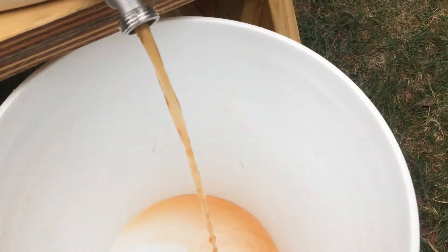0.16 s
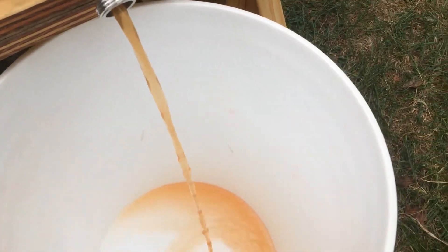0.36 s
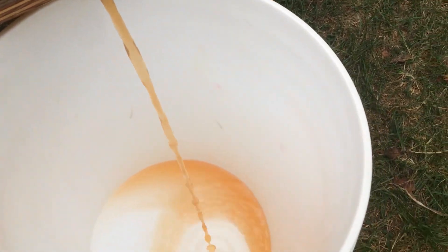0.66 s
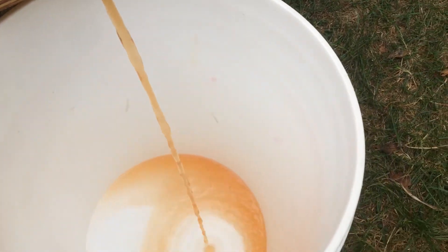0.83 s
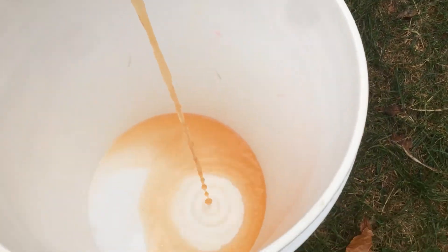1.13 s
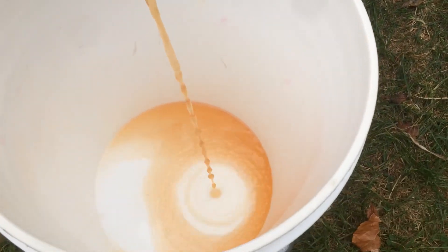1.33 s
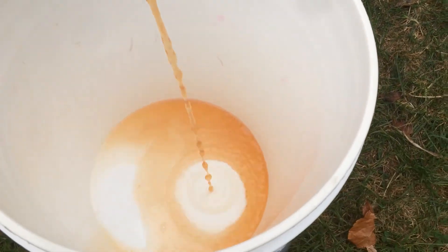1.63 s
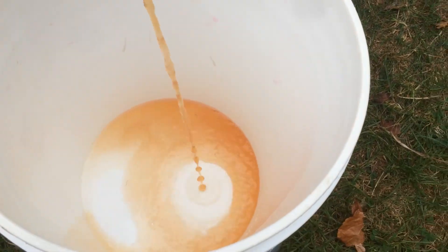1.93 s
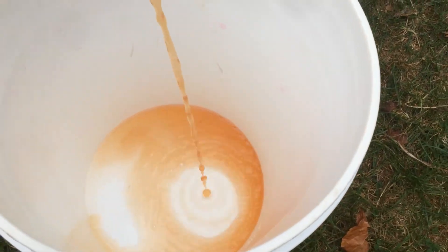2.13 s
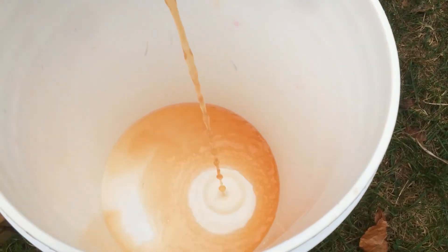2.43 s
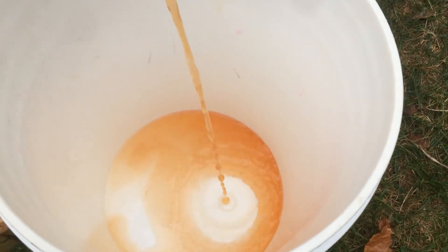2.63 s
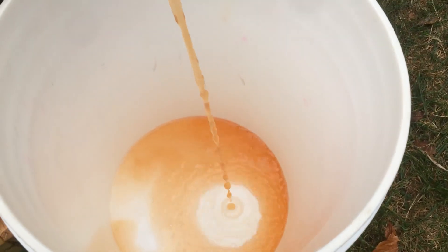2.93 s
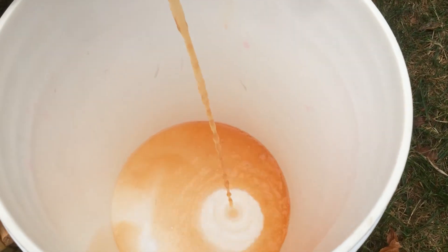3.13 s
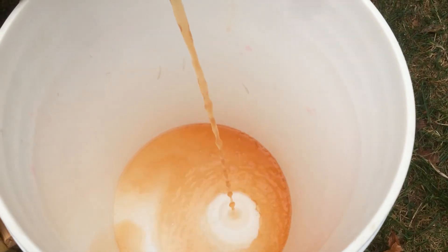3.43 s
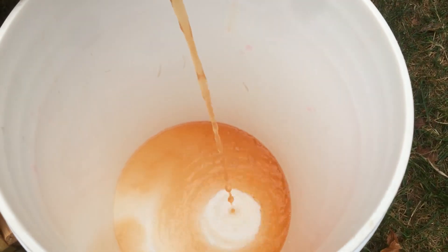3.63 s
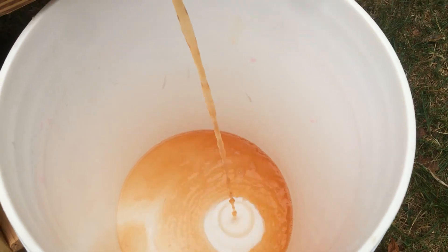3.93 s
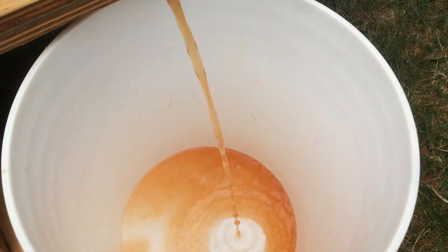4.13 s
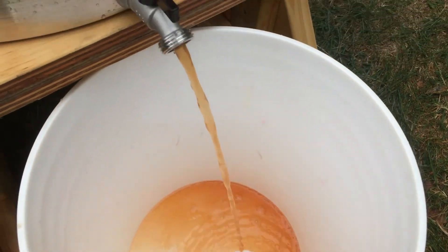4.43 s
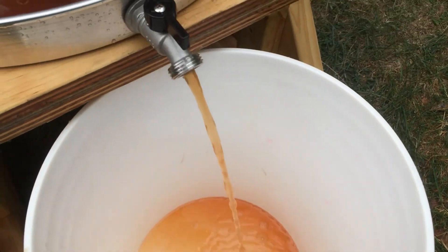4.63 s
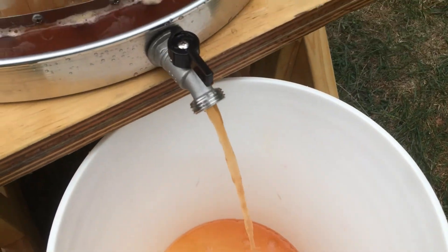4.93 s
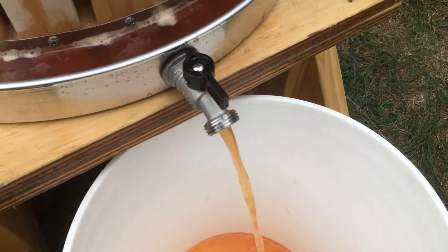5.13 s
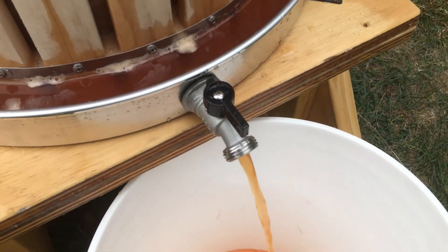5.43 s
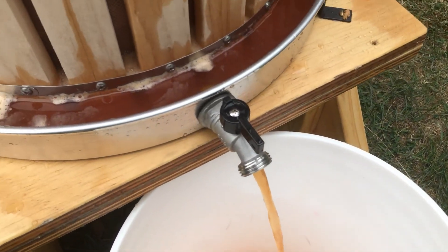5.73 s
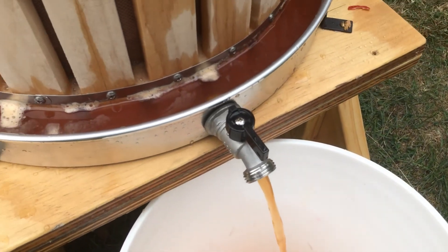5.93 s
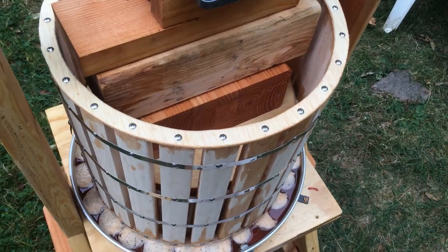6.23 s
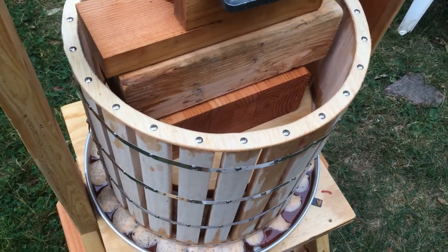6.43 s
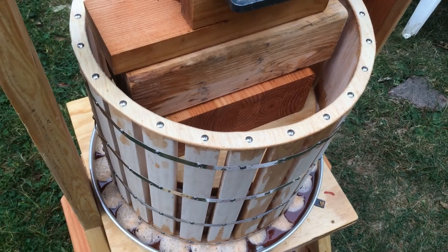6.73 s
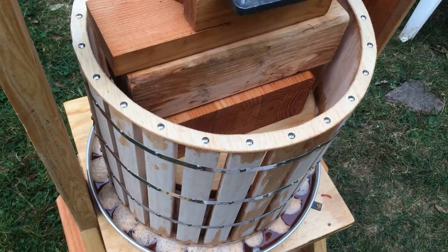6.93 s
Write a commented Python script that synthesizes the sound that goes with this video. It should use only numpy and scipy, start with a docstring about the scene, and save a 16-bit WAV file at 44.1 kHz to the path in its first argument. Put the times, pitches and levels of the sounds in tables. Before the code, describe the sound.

Close at a bucket's rim outdoors, a thin stream of juice breaks into beads that patter irregularly on the shallow liquid, with hollow plastic thuds, wet slaps and tiny bright bubble plinks. It thickens in the middle, then eases. One soft knock rattles the bucket late on. Abruptly the sound changes to a much quieter wooden press, where juice and foam spit, fizz and crackle.

```python
"""Juice dripping into a bucket

A thin stream of juice falls from a fruit press into an almost empty plastic bucket, outdoors, heard from the rim.
Its beads excite ringing modes of the bottom and shell, slap the juice in noise bursts and trap bubbles,
which are short decaying sine tones. The bucket gets one bump, made of ringing modes and a rattle.
At 6.1 s we are at the press itself, where juice and foam spit and crackle between the slats."""
import sys
import numpy as np
from scipy import signal
from scipy.fft import rfft, irfft, next_fast_len
from scipy.io import wavfile
from scipy.ndimage import uniform_filter1d

SR = 44100
rng = np.random.default_rng(int(sys.argv[2]) if len(sys.argv) > 2 else 0)


def wrap_up_sound(samples):
    """Save the sound to the file named by the first command line argument, as 16-bit audio."""
    columns = np.atleast_2d(samples).T
    # keep every value between -1 and 1, then stretch to whole-number steps
    tamed = np.clip(columns, -1, 1)
    steps = np.round(tamed * 32767).astype(np.int16)
    wavfile.write(sys.argv[1], SR, steps)


N = 311787
TIME = np.arange(N) / SR  # seconds, for the whole sound
AGE = np.arange(SR // 4) / SR  # seconds since the start of one short event
PRESS_START_S = 6.115  # the bucket gives way to the press
TOP_HZ = 16100  # nothing is kept from here up

# Large beads that hit the bottom. Each row: start in seconds, then relative levels of slap, thud and crack in dB.
LARGE_BEADS = [(0.143, -29.5, -46.5, -47.5), (0.291, -34, -54, -44), (0.335, -42.5, -48.5, -51),
               (0.433, -34, -47.5, -39), (0.469, -29, -45, -46.5), (0.56, -30, -49, -45),
               (0.614, -45, -49, -64), (0.739, -42.5, -50, -94), (0.784, -28, -42.5, -55.5),
               (0.798, -65, -44.5, -49), (0.888, -44, -49, -67), (1.052, -39, -54, -60),
               (1.132, -30.5, -43, -65), (1.148, -34, -48.5, -80), (1.209, -38, -47, -66),
               (1.263, -47.5, -54.5, -71), (1.399, -32, -47, -60), (1.413, -49, -55, -53),
               (1.444, -37.5, -55, -49.5), (1.519, -31, -44.5, -54.5), (1.546, -26.5, -54, -38.5),
               (1.572, -27.5, -47.5, -49), (1.581, -29, -61, -47), (1.599, -33, -42.5, -62),
               (1.613, -27.5, -46, -48), (1.65, -38, -47, -50.5), (1.794, -36.5, -48.5, -56.5),
               (1.819, -30.5, -46, -61), (1.907, -32.5, -48, -59), (1.886, -53, -45.5, -64),
               (1.951, -29.5, -42.5, -54), (2.073, -33, -59, -48), (2.147, -57, -58, -78),
               (2.212, -27, -39.5, -43.5), (2.248, -36, -47.5, -48), (2.352, -40.5, -50.5, -62.5),
               (2.406, -30, -43, -48), (2.465, -34, -46.5, -48.5), (2.518, -27, -45, -73),
               (2.551, -51, -47, -69), (2.598, -31, -43, -76), (2.745, -35, -44, -54.5),
               (2.777, -25, -41.5, -43.5), (2.814, -32, -40.5, -56), (2.885, -35.5, -47, -57),
               (2.968, -39, -40, -61), (2.999, -26.5, -42, -65.5), (3.045, -27.5, -46, -50.5),
               (3.075, -27, -44, -43), (3.17, -32, -50, -45), (3.201, -35, -50, -55),
               (3.22, -36, -41.5, -54), (3.336, -30.5, -39, -77), (3.36, -36.5, -45, -49.5),
               (3.398, -40, -44.5, -49), (3.415, -32, -40.5, -43), (3.459, -26.5, -39.5, -46),
               (3.503, -33, -41.5, -45), (3.622, -30, -42.5, -47), (3.702, -34.5, -43, -54),
               (3.779, -26.5, -39, -42.5), (3.828, -39, -44.5, -55), (3.847, -32.5, -42, -43.5),
               (3.932, -46, -47.5, -65), (4.022, -39.5, -43, -61), (4.111, -47.5, -46.5, -60.5),
               (4.209, -36, -43, -46.5), (4.285, -33.5, -41.5, -61), (4.324, -34, -42.5, -53),
               (4.358, -37.5, -45, -51.5), (4.449, -39.5, -45.5, -61), (4.5, -46, -47, -67),
               (4.53, -39.5, -43.5, -62), (4.683, -36.5, -41, -52), (4.782, -37.5, -40.5, -54.5),
               (4.864, -47.5, -49, -57), (5.065, -75, -47, -92), (5.226, -36, -41, -47),
               (5.267, -30.5, -41, -48), (5.359, -50, -47.5, -55), (5.431, -42.5, -44.5, -61.5),
               (5.533, -42, -44.5, -54.5), (5.688, -36, -41.5, -46), (5.708, -34, -42.5, -46),
               (5.91, -47, -47.5, -81), (5.975, -37.5, -47.5, -61.5), (6.073, -32, -41, -49.5)]
# Spells of small beads. Each row: first and last time in seconds, relative slap and thud levels in dB.
PATTER_SPELLS = [(0.189, 0.29, -49.5, -50.5), (1.821, 2.3, -42, -51.5), (2.645, 2.748, -50, -54.5),
                 (2.985, 3.25, -41.5, -47), (3.34, 3.519, -43, -51), (3.79, 4.42, -52, -60),
                 (4.85, 6.097, -56.5, -58.5)]
# Steady push of the stream on the bottom. Each row: time in seconds, relative level in dB.
STREAM_PUSH = [(0.04, -44), (0.34, -43.5), (0.85, -48.5), (1.22, -46.5), (1.75, -42.5), (2.3, -45.5),
               (2.96, -40.5), (3.14, -49.5), (4.99, -45.5), (5.54, -54.5), (5.93, -46), (6.0, -62)]
# Low modes of the wet bottom. Each row: pitch in Hz, width in Hz, relative level in dB.
BOTTOM_MODES = [(124.9, 13.2, -8.5), (169.3, 10.4, -6), (202.2, 14.1, -1.5)]
# Level of the deepest of these modes as juice gathers. Each row: time in seconds, relative level in dB.
DEEPEST_LEVEL = [(0, 4.5), (1.3, 5), (2.5, -5.5), (6, -1.5)]
# Two middle modes of the bottom, which sink as juice gathers, while the upper one takes over.
# Each row: time in seconds, lower pitch in Hz, lower level in dB, upper pitch in Hz, upper level in dB.
THUD_PAIR = [(0, 576, -0.5, 693, -14), (1.6, 545, 1.5, 684, -3), (2.3, 510, -4, 615, -5),
             (3.2, 503, -11, 613.5, -2), (4.3, 476, -10, 591, 3), (6, 427, -19, 543.3, -0.5)]
# Higher modes of the bucket. Each row: pitch in Hz, relative level in dB, time to die by 60 dB in seconds.
SHELL_MODES = [(775, 1.5, 0.11), (852, -2, 0.11), (945, 3.5, 0.07), (1013, -3.5, 0.1), (1100.5, 3.5, 0.075),
               (1241, -10, 0.13), (1405, 2.5, 0.066), (1488, -0.5, 0.079), (1570, 1, 0.05),
               (1780, -7, 0.098), (1950, -17.5, 0.28), (2150, -15, 0.12), (2244, -11.5, 0.092)]
# Colour of the slap's splash. Each row: frequency in Hz, level in dB per Hz.
SPLASH_SPECTRUM = [(200, 2.5), (700, 10), (1100, -22.5), (2000, -1), (4500, -7.5), (12000, -18),
                   (16000, -29)]
# Colour of a bead's first crack on the juice. Each row: frequency in Hz, level in dB per Hz.
CRACK_SPECTRUM = [(200, -11.5), (700, 1), (1500, -3), (2500, -8), (4500, -9), (12000, -11.5),
                  (16000, -16.5)]
# How sounds die in the hollow of the bucket. Each row: frequency in Hz, time to die by 60 dB in seconds.
HOLLOW_DECAY = [(400, 0.43), (1000, 0.17), (2000, 0.16), (4000, 0.16), (14000, 0.054)]
# The loudest bubbles in the bucket. Each row: start in seconds, relative level in dB, pitch in Hz.
LOUD_BUBBLES = [(0.254, -29.5, 14000), (0.269, -29, 9000), (0.2942, -23.5, 4930), (0.4325, -21, 3120),
                (0.448, -33, 12100), (0.591, -38, 11370), (0.7653, -31.5, 10650), (1.236, -35.5, 9130),
                (1.4324, -35, 9700), (1.4451, -33, 8850), (1.545, -24.5, 7400), (1.5601, -25, 6800),
                (1.593, -32, 7450), (1.8317, -30, 7290), (1.936, -29.5, 7700), (1.9618, -33.5, 3050),
                (1.9867, -25.5, 7100), (2.0863, -35.5, 9700), (2.2467, -24.5, 12800), (2.283, -33.5, 8300),
                (2.479, -26.5, 9000), (2.776, -30.5, 4540), (2.8848, -28.5, 11300), (2.9897, -26.5, 8900),
                (2.9999, -23, 5050), (3.016, -25, 5100), (3.0767, -25.5, 4500), (3.0879, -23, 7740),
                (3.184, -23, 7300), (3.373, -34, 8100), (3.4117, -31.5, 4900), (3.437, -33.5, 8060),
                (3.5025, -24, 5130), (3.622, -32.5, 7900), (3.6559, -32, 11300), (3.815, -40, 7640),
                (3.837, -32.5, 10700), (3.964, -38, 8960), (4.107, -35.5, 10600), (4.143, -37, 11890),
                (4.2098, -33.5, 4440), (4.277, -38.5, 9500), (4.3842, -31.5, 9300), (4.72, -39.5, 9130),
                (4.7537, -33, 8500), (4.838, -34, 7640), (4.8947, -32, 7900), (4.909, -30.5, 7760),
                (4.9518, -30, 10300), (5.084, -36, 8200), (5.24, -34.5, 10500), (5.578, -35, 9300),
                (5.7, -28.5, 8550), (5.829, -40, 9610), (5.931, -37, 8950)]
# Level of the fine spray. Each row: time in seconds, level in dB.
SPRAY_LEVEL = [(1.4, -70), (2, -53.5), (4.5, -47), (6.1, -40)]
# Short swelling tones, single or stacked. Each row: start in seconds, relative level in dB, list of pitches in Hz.
SWELLING_TONES = [(1.144, -55, [2140, 2430, 2745, 3750, 4230, 5720]), (1.598, -43, [1500, 5600]),
                  (1.809, -53, [1405, 1754, 2270]), (3.087, -48, [3710, 4570, 5950, 7340, 8080]),
                  (4.436, -58, [2885, 1860, 2640]), (4.794, -53, [1410, 1814, 2100, 3120]),
                  (5.428, -58, [1927]), (5.983, -59, [1577, 1959]), (6.217, -47.5, [2750]),
                  (6.895, -51, [3100, 2450]), (6.98, -47, [2000, 2200]), (7.03, -52, [1900])]
# Modes of the bumped wall. Each row: pitch in Hz, relative level in dB, time to die by 60 dB in seconds.
BUMP_MODES = [(378, -1, 0.12), (934, -23, 0.18), (1350, -18, 0.14), (1760, -19, 0.22)]
# Juice spitting between the slats. Each row: start in seconds, level in dB, pitch in Hz, relative squelch in dB.
SLAT_SPITS = [(6.224, -43.5, 6440, -51), (6.269, -38, 9200, -62), (6.27, -38, 4060, -61),
              (6.281, -28.5, 4420, -46), (6.285, -38, 11900, -65), (6.379, -48, 3600, -64),
              (6.41, -42, 6950, -82), (6.461, -34, 7100, -37.5), (6.575, -37.5, 7000, -55),
              (6.583, -38, 3700, -52.5), (6.685, -41, 6500, -60), (6.701, -44.5, 7300, -61),
              (6.781, -38.5, 11700, -50.5), (6.786, -37.5, 5970, -54), (6.866, -72, 3600, -60),
              (6.896, -46, 6800, -48), (6.932, -38, 3500, -74), (6.945, -27, 4440, -46),
              (6.954, -33.5, 7500, -72), (6.986, -58, 3800, -51), (7.032, -49.5, 1700, -61)]
# Colour of the wet squelch. Each row: frequency in Hz, level in dB per Hz.
SQUELCH_SPECTRUM = [(100, -6), (280, 1), (2500, -4), (6000, -6), (16000, -35.5)]
# Short gushes of crackling foam. Each row: start in seconds, length in seconds, level in dB.
FOAM_GUSHES = [(6.54, .048, -45), (6.895, .08, -48)]
# Colour of the foam's hiss. Each row: frequency in Hz, level in dB per Hz.
FOAM_SPECTRUM = [(60, -3), (190, 5), (430, 1), (1000, 9.5), (5000, -4), (7200, -8), (16000, -17)]
# Juice running down the slats. Each row: time in seconds, relative level in dB.
SEEP_LEVEL = [(4.3, -61), (4.95, -69), (6.1, -67), (6.3, -63), (6.6, -56.5), (6.8, -74), (7.07, -62.5)]
# Colour of the outdoor air. Each row: frequency in Hz, level in dB per Hz.
AIR_SPECTRUM = [(20, -15.5), (60, 0.5), (110, 4), (300, -16.5), (1000, -24.5), (3000, -37), (16000, -45.5)]

# a smaller bead trails each large one: least lag (s), mean extra lag (s), mean level change (dB)
TRAIL_S, TRAIL_SPREAD_S, TRAIL_DB = 0.011, 0.01, -9.5
PATTER_PER_S = 45  # small beads per second
SLAP_DB, THUD_DB, CRACK_DB = -14, 6.5, 11  # added to the levels of each blow
# the thud: decay (s), rise (s), scatter of its pitch (share)
THUD_T60_S, THUD_RISE_S, THUD_SCATTER = 0.082, 0.0052, 0.022
SHELL_RISE_S, SPLASH_DB = 0.006, -13  # the shell rings up (s); splash relative to that ring (dB)
CRACK_T60_S = 0.023  # decay of the crack (s)
PUSH_DB = 1  # added to the push
# a bead's kick on the low modes over its thud (dB); the gathering juice cushions it (dB per s)
KICK_DB, CUSHION_DB_PER_S = 69, 1.13
# air dragged under by a bead: mean delay (s), mean level over the bead's table crack (dB), usual pitch (Hz)
TRAP_S, TRAPPED_DB, TRAPPED_HZ = 0.004, -1.5, 6770
FLIGHT_S, DROPLET_DB = 0.03, -53  # thrown droplets: mean flight (s), level (dB)
# a swelling tone: time to its peak (s), rise in pitch (share per s), rms waver (Hz)
TONE_SWELL_S, TONE_GLIDE_PER_S, TONE_WAVER_HZ = 0.009, 0.9, 30
TONE_DB, TONE_STEP_DB = 2, -0.7  # added to all; added again for each next tone in a stack
BUMP_S, BUMP_DB, RATTLE_DB = 5.762, -33, -40  # the bump: time (s), ring (dB), rattle (dB)
SAG, SAG_T60_S = 0.116, 0.097  # the flexed wall starts sharp (share) and settles (s)
# the boom of the bottom under the bump: settled pitch (Hz), level (dB), decay (s), rise (s)
BOOM_HZ, BOOM_DB, BOOM_T60_S, BOOM_RISE_S = 197, -20, 0.23, 0.1
OPEN_DB = -8  # many-bubble sounds at the press have this much less echo than in the bucket (dB)


def amp(db):
    """Turn decibels into a gain."""
    return 10 ** (np.asarray(db) / 20)


def unit(x):
    """Scale to an rms of 1."""
    return x / np.sqrt(np.mean(x ** 2) + 1e-20)


def head(x, size):
    """Scale so that the first samples have an rms of 1."""
    return x / np.sqrt(np.mean(x[:size] ** 2) + 1e-20)


def along(points, hz):
    """Read a value between (Hz, value) points on a log frequency axis."""
    f, v = np.transpose(points)
    return np.interp(np.log(hz + 1), np.log(f + 1), v)


def curve(rows, t):
    """Join (seconds, value) rows by straight lines."""
    return np.interp(t, *np.transpose(rows))


def fade(t60, t=AGE):
    """Die away exponentially, by 60 dB in t60 seconds."""
    return np.exp(-np.log(1000) * t / t60)


def filtered(x, response):
    """Multiply the spectrum of x by a response to frequency."""
    m = next_fast_len(len(x) + SR // 8)  # room for the filter to ring out
    spectrum = rfft(x, m) * response(np.fft.rfftfreq(m, 1 / SR))
    return irfft(spectrum, m)[:len(x)]


def band(x, low_hz, high_hz):
    """Keep the sound between two frequencies."""
    sos = signal.butter(2, [low_hz, high_hz], "band", fs=SR, output="sos")
    return signal.sosfilt(sos, x)


def noise(spectrum, size):
    """Make coloured noise of rms 1."""
    return unit(filtered(rng.standard_normal(size), lambda hz: amp(along(spectrum, hz))))


def add(track, s, sound):
    """Mix a sound into the track at time s."""
    part = track[max(round(s * SR), 0):][:len(sound)]
    part += sound[:len(part)]


def stream():
    """The stream breaks into large beads, their trailers and small patter; list time and levels of each."""
    large = np.array(LARGE_BEADS)
    lag = TRAIL_S + TRAIL_SPREAD_S * rng.exponential(size=len(large))
    weaker = TRAIL_DB + 4 * rng.standard_normal((len(large), 1))
    trailers = np.column_stack([large[:, 0] + lag, large[:, 1:] + weaker])
    small = []
    for start, end, slap_db, thud_db in PATTER_SPELLS:
        # the stream pinches off beads at a loosely even pace
        for s in np.arange(start, end, 1 / PATTER_PER_S):
            db = rng.uniform(-5, 5)
            when = s + rng.random() / PATTER_PER_S
            small.append((when, slap_db + db, thud_db + db, slap_db + db - 18))
    return np.vstack([large, trailers, small])


def beads(blows):
    """Each bead cracks and slaps on the juice and thuds on the bottom; the shell rings on in narrow modes."""
    out, t = np.zeros(N), AGE[:SR // 6]
    modes = np.array([amp(db) * fade(t60, t) * np.sin(2 * np.pi * hz * t) for hz, db, t60 in SHELL_MODES])
    modes *= 1 - fade(SHELL_RISE_S, t)
    thud_shape = fade(THUD_T60_S, t) * (1 - fade(THUD_RISE_S, t))
    crack_shape = fade(CRACK_T60_S, t)
    # one long noise of each colour, cut into a piece per bead
    splashes = noise(SPLASH_SPECTRUM, len(blows) * len(t)).reshape(len(blows), -1)
    cracks = noise(CRACK_SPECTRUM, len(blows) * len(t)).reshape(len(blows), -1)
    for (s, slap_db, thud_db, crack_db), splash, crack in zip(blows, splashes, cracks):
        thud = thud_shape * thud_ring(s, t)
        # each bead excites the shell modes in its own random mix
        mix = rng.choice([-1, 1], len(modes)) * amp(rng.standard_normal(len(modes)))
        shell = mix @ modes
        slap = head(shell, size=400) + amp(SPLASH_DB) * head(hollow(splash), size=400)
        blow = amp(thud_db + THUD_DB) * thud
        blow += amp(slap_db + SLAP_DB) * slap
        blow += amp(crack_db + CRACK_DB) * crack * crack_shape
        add(out, s, blow)
    return out


def thud_ring(s, t):
    """The bottom's two middle modes ring, at pitches set by how the juice loads them at time s."""
    when, *columns = np.transpose(THUD_PAIR)
    pairs = np.reshape([np.interp(s, when, column) for column in columns], (2, 2))
    out = np.zeros(len(t))
    for hz, db in pairs:
        pitch = hz * np.exp(THUD_SCATTER * rng.normal())
        out += amp(db) * np.sin(2 * np.pi * pitch * t)
    return out


def hollow(x):
    """Let a burst die as it does between the bucket's walls, treble first."""
    hz, t, z = signal.stft(x, SR, nperseg=128)
    decay = fade(along(HOLLOW_DECAY, hz)[:, None], t)
    return signal.istft(z * decay, SR, nperseg=128)[1][:len(x)]


def drumming(blows):
    """The stream's push keeps the bottom humming; each bead kicks it on top of that."""
    hum = bottom(rng.standard_normal(N))
    # the flow is steady, so the modes keep an even swing
    hum /= np.sqrt(np.abs(uniform_filter1d(hum ** 2, size=2000)) + 1e-12)
    pushed = amp(curve(STREAM_PUSH, TIME) + PUSH_DB) * hum
    kicks = np.zeros(N)
    for s, slap_db, thud_db, crack_db in blows:
        add(kicks, s, amp([thud_db + KICK_DB - CUSHION_DB_PER_S * s]))
    return band(pushed, low_hz=98, high_hz=246) + band(bottom(kicks), low_hz=74.3, high_hz=325)


def bottom(force):
    """The low modes of the wet bottom resonate in answer to a force."""
    def mode(centre, width, db):
        """One resonance answers most strongly at its centre frequency."""
        return filtered(force, lambda f: amp(db) * 1j * f * width / (centre ** 2 - f ** 2 + 1j * f * width))

    deep, middle, upper = [mode(*row) for row in BOTTOM_MODES]
    return amp(curve(DEEPEST_LEVEL, TIME)) * deep - middle + upper


def bubbles():
    """Trapped air rings in the bucket: loud bubbles, air under the beads, thrown droplets and fine spray."""
    out = np.zeros(N)
    for s, db, hz in LOUD_BUBBLES:
        sound = ping(hz, cycles=17, scatter_s=0.017, scatter_db=4.5, tail_db=-12)
        add(out, s, amp(db - 8) * sound)
    # the harder beads drag more air under
    for s, slap_db, thud_db, crack_db in LARGE_BEADS:
        hz = min(TRAPPED_HZ * np.exp(0.58 * rng.normal()), 14000)
        when = s + TRAP_S * rng.exponential()
        level = amp(crack_db + TRAPPED_DB + 2 * rng.normal())
        add(out, when, level * ping(hz, cycles=8.9, scatter_s=0.017, scatter_db=-1, tail_db=-3))
    # each large bead throws up two droplets that land a moment later
    thrown = np.repeat([row[0] for row in LARGE_BEADS], 2)
    landings = thrown + FLIGHT_S * rng.exponential(size=len(thrown))
    droplets = fizz(landings, centre_hz=10750, spread=0.078, range_db=6, cycles=17)
    moments = rng.uniform(0, PRESS_START_S, size=300)
    spray = fizz(moments, centre_hz=9730, spread=0.29, range_db=20, cycles=25)
    return out + amp(DROPLET_DB) * droplets + amp(curve(SPRAY_LEVEL, TIME)) * spray


def ping(hz, cycles, scatter_s, scatter_db, tail_db):
    """A tiny bubble dies by 60 dB in some cycles; nearby surfaces scatter it, then a faint tail follows."""
    t = AGE[:SR // 12]
    tone = np.sin(2 * np.pi * hz * t) * fade(cycles / hz, t)
    early, late = rng.standard_normal((2, len(t))) * [fade(scatter_s, t), fade(0.11, t)]
    paths = amp(scatter_db) * early / np.linalg.norm(early)
    paths += amp(tail_db) * late / np.linalg.norm(late)
    paths[0] += 1  # the direct sound
    # a bubble radiates little below its own pitch
    b, a = signal.butter(2, hz / 2, "high", fs=SR)
    return head(signal.lfilter(b, a, signal.fftconvolve(tone, paths)[:len(t)]), size=132)


def fizz(times, centre_hz, spread, range_db, cycles, echo_db=0):
    """Many bubbles ring at scattered pitches, mostly faint, a few louder."""
    out = np.zeros(N)
    pitches, sizes = rng.standard_normal(len(times)), rng.random(len(times))
    for when, pitch, size in zip(times, pitches, sizes):
        hz = min(centre_hz * np.exp(spread * pitch), 14000)
        sound = ping(hz, cycles, scatter_s=0.014, scatter_db=3 + echo_db, tail_db=-5 + echo_db)
        add(out, when, amp(range_db * (size ** 2 - 1)) * sound)
    return out


def swelling_tones():
    """Soft tones swell and die within about 40 ms, wavering slightly and rising a little in pitch."""
    out = np.zeros(N)
    swell = (AGE / TONE_SWELL_S * np.exp(1 - AGE / TONE_SWELL_S)) ** 2
    for s, db, pitches in SWELLING_TONES:
        for k, hz in enumerate(pitches):
            waver = TONE_WAVER_HZ * unit(uniform_filter1d(rng.standard_normal(len(AGE)), size=220))
            pitch = hz * (1 + TONE_GLIDE_PER_S * (AGE - TONE_SWELL_S)) + waver
            tone = np.sin(2 * np.pi * np.cumsum(pitch) / SR)
            add(out, s, amp(db + TONE_DB + k * TONE_STEP_DB) * swell * tone)
    return out


def bump():
    """One soft knock from outside makes the bucket's wall ring and rattle and its bottom boom."""
    out = np.zeros(N)
    rattle_spectrum = [(150, -4), (1500, -9.5), (2600, -27.5), (8000, -60)]  # Hz, dB per Hz
    rattle = head(hollow(noise(rattle_spectrum, len(AGE))), size=400)
    boom = ring([(BOOM_HZ, BOOM_DB, BOOM_T60_S)], SAG / 2) * (1 - fade(BOOM_RISE_S))
    add(out, BUMP_S, amp(BUMP_DB) * ring(BUMP_MODES, SAG) + amp(RATTLE_DB) * rattle + boom)
    return out


def ring(modes, sag):
    """Decaying modes start sharp by a share and settle."""
    clock = np.cumsum(1 + sag * fade(SAG_T60_S)) / SR  # runs fast at first
    return sum(amp(db) * fade(t60) * np.sin(2 * np.pi * hz * clock) for hz, db, t60 in modes)


def press():
    """Juice and air squeeze through the slats in spits and gushes, over foam and gurgles."""
    return spits() + gushes() + foam()


def spits():
    """Each wet spit is a ringing bubble with a burst of squelching noise."""
    out = np.zeros(N)
    for s, db, hz, squelch_db in SLAT_SPITS:
        add(out, s, amp(db) * ping(hz, cycles=10, scatter_s=0.02, scatter_db=7, tail_db=-8))
        add(out, s, amp(squelch_db + 5.5) * noise(SQUELCH_SPECTRUM, len(AGE)) * fade(0.081))
    return out


def gushes():
    """Each gush packs 22 crackling foam bubbles into a short time."""
    out = np.zeros(N)
    for s, length, db in FOAM_GUSHES:
        moments = s + length * rng.random(size=22)
        crackle = fizz(moments, centre_hz=3940, spread=0.43, range_db=7.5, cycles=5.8, echo_db=OPEN_DB)
        out += amp(db) * crackle
    return out


def foam():
    """Foam bubbles pop at high pitches and others gurgle low, over a soft steady hiss."""
    moments = rng.uniform(PRESS_START_S, N / SR, size=190)
    pops = fizz(moments, centre_hz=7100, spread=0.17, range_db=16, cycles=20, echo_db=OPEN_DB)
    moments = rng.uniform(PRESS_START_S, N / SR, size=55)
    gurgle = fizz(moments, centre_hz=520, spread=0.22, range_db=12, cycles=13, echo_db=OPEN_DB)
    return amp(-47) * pops + amp(-46.5) * gurgle + amp(-65) * noise(FOAM_SPECTRUM, N)


def seep():
    """Juice running down the slats crackles as many short bubbles, already faint before the press is reached."""
    moments = rng.uniform(4.7, N / SR, size=380)
    crackle = fizz(moments, centre_hz=2800, spread=0.5, range_db=20, cycles=12, echo_db=OPEN_DB)
    return amp(curve(SEEP_LEVEL, TIME) + 11) * crackle


def outdoor_air(level_db):
    """Quiet outdoor air is a steady, mostly low noise."""
    return amp(level_db) * noise(AIR_SPECTRUM, N)


def scene():
    """First the bucket, then the press, in quiet outdoor air."""
    at_press = np.clip((TIME - PRESS_START_S) / 0.006 + 0.5, 0, 1)  # a 6 ms crossfade
    blows = stream()
    bucket = drumming(blows) + beads(blows) + bubbles() + bump() + outdoor_air(-57.5)
    slats = press() + outdoor_air(-65)
    return ((1 - at_press) * bucket + at_press * slats + seep() + swelling_tones())[None]


def record(dry):
    """The microphone dulls the top treble; nothing is kept above the band limit."""
    dulled = filtered(dry[0], lambda hz: amp(along([(11000, -1), (16000, -9)], hz)))
    return filtered(dulled, lambda hz: hz < TOP_HZ)[None]


dry = scene()
out = record(dry)
wrap_up_sound(out)
```